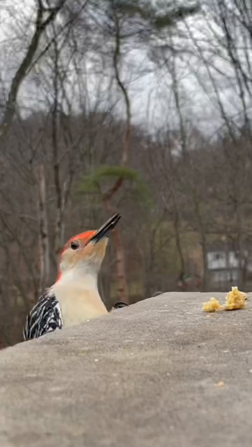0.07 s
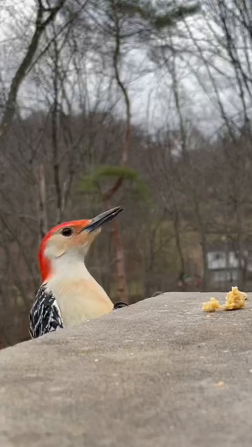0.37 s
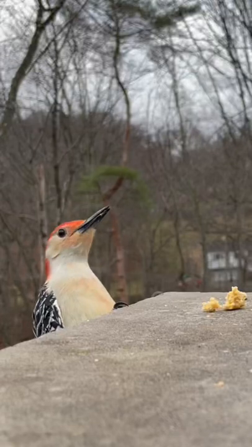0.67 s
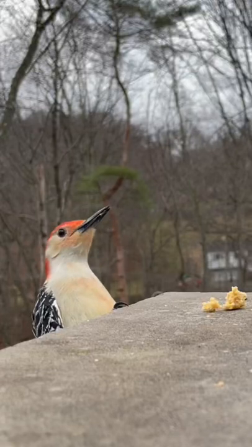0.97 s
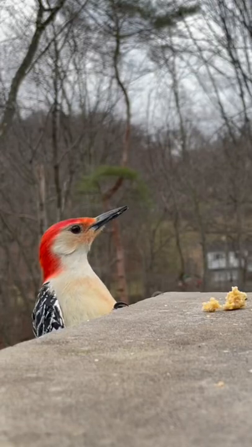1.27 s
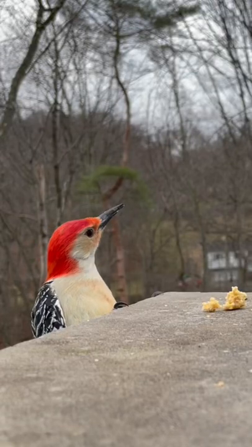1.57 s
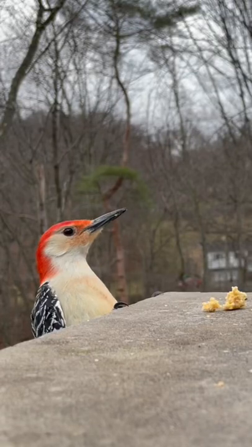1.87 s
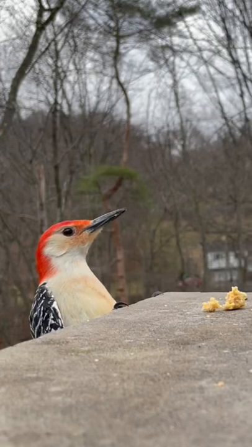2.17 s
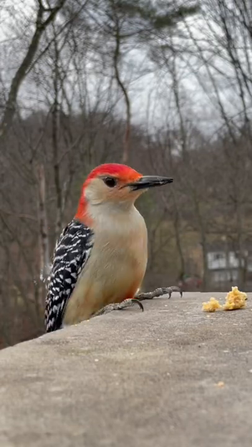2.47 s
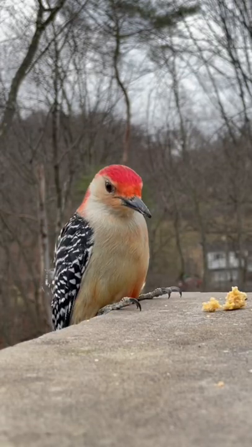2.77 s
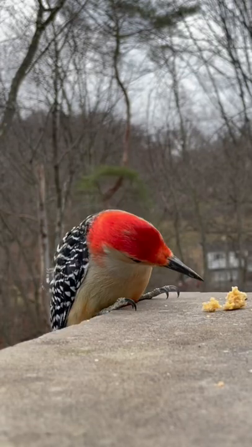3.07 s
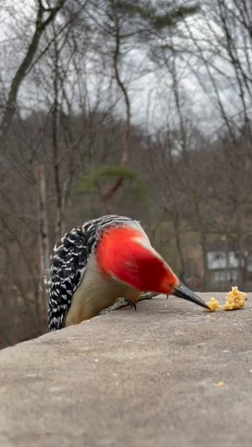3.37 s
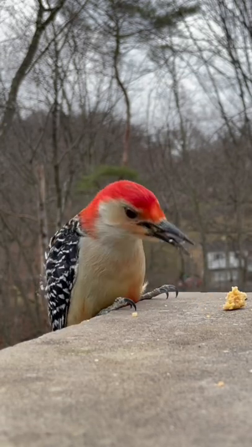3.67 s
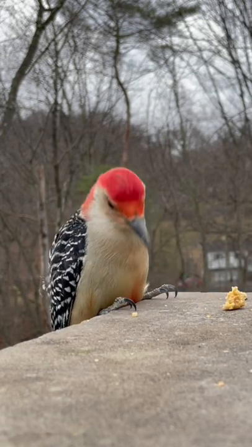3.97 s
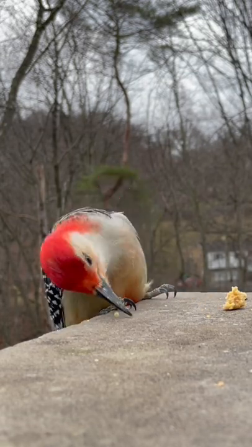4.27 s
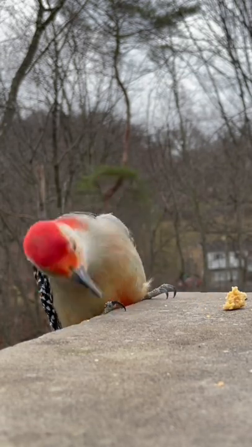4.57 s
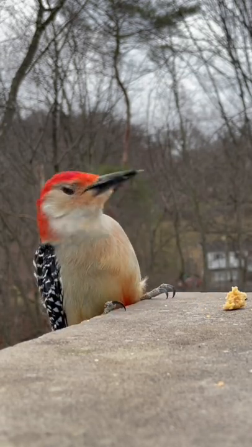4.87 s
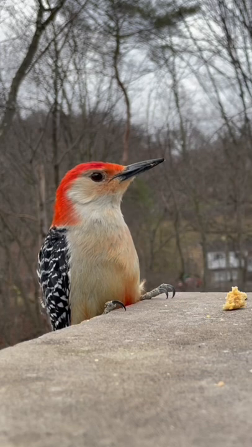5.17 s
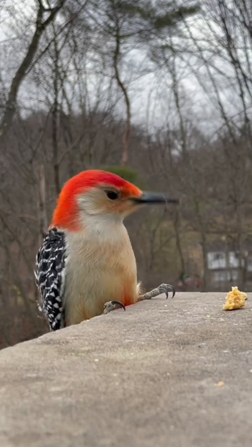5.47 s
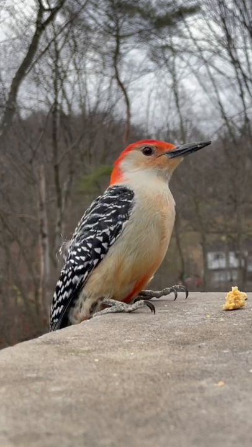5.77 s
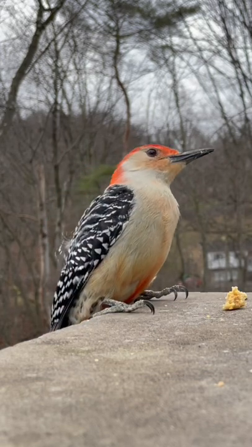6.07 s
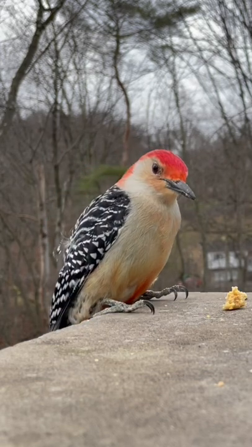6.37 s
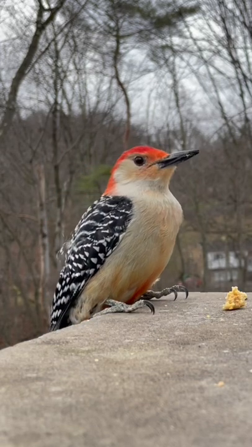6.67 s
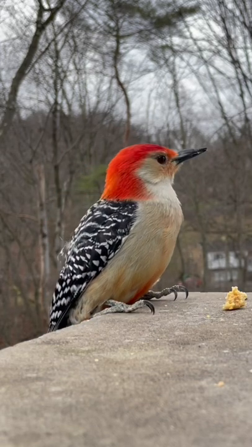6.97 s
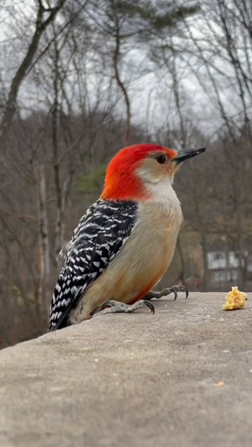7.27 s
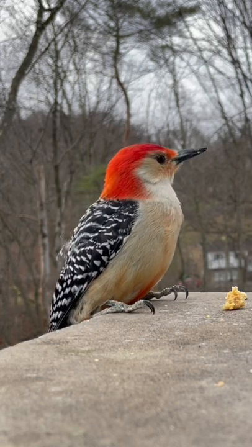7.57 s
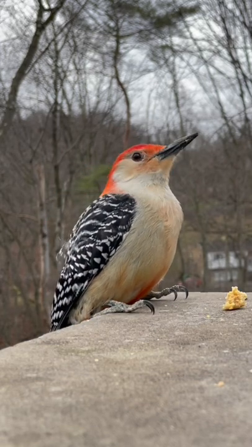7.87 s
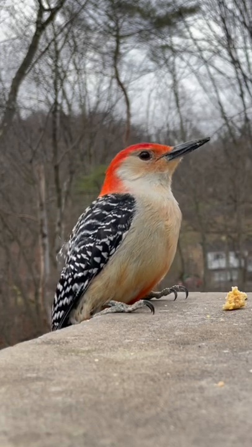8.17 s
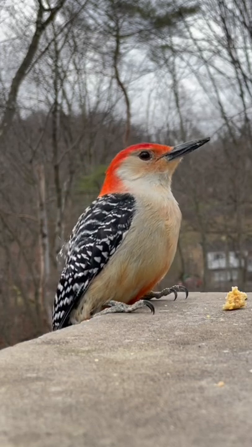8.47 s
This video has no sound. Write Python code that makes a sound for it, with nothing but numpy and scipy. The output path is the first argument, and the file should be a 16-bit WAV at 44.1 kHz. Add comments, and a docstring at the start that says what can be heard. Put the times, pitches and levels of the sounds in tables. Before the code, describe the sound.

The sound opens with a click, a scuff and a quick cluster of dull thuds as the microphone stand is bumped, over by 0.4 seconds. Low outdoor rumble and distant road noise run throughout, the tyre hiss slowly receding, with a faraway engine's low drone that dips briefly before 1 second. A few thin ticks and feather rustles come in the first second. From about 2 to 3.6 seconds a songbird gives a fast, high trill that swells and echoes among trees, slightly to the left. From 2.4 to 5.7 seconds a woodpecker close by ticks and scratches on a stone ledge with claws and beak, feathers rustling softly. There is a soft thud near 4.2 seconds, and the sharpest ticks come around 5.5. Faint distant birds pipe, buzz and chirp, mostly from 3.5 seconds until the end at about 8.5.

```python
"""On a stone ledge at the edge of a wood, a woodpecker shuffles and picks crumbs by a stereo microphone.
Claws and beak tick on the stone, feathers rustle by friction, and the microphone's stand, bumped at
the start, thuds in its low modes. A songbird trills and others call far off, their notes scattered
into reverberation by the trees. Beneath lie broadband road noise and a distant engine's harmonic drone."""
import sys
import numpy as np
from scipy import signal
from scipy.fft import rfft, irfft
from scipy.io import wavfile
from scipy.ndimage import uniform_filter1d

SR = 44100
rng = np.random.default_rng(int(sys.argv[2]) if len(sys.argv) > 2 else 0)


def int16_out(signal):
    """Quantize to a 16-bit WAV file."""
    q = np.round(np.clip(np.atleast_2d(signal).T, -1, 1) * 32767)
    wavfile.write(sys.argv[1], SR, q.astype(np.int16))


N = 375732
T = np.arange(N) / SR
FREQS = np.maximum(np.arange(N // 2 + 1) * SR / N, 1)


def undb(db):
    """Amplitude ratio: tenfold for every 20 dB."""
    return 10 ** (np.asarray(db) / 20)

def over_time(table):
    """Linear interpolation of (seconds, value) rows at every sample."""
    return np.interp(T, *np.transpose(table))

def over_hz(table):
    """Interpolation of (Hz, value) rows on a logarithmic frequency axis."""
    hz, value = np.transpose(table)
    return np.interp(np.log(FREQS), np.log(hz), value)

def colour(x, spectrum):
    """Spectral shaping, normalised so that white noise keeps its power."""
    gain = undb(over_hz(spectrum))
    return irfft(rfft(x) * gain / np.sqrt(np.mean(gain ** 2)), N)

def walk(rate):
    """Random modulation: rate steps a second, smoothed and scaled to unit deviation."""
    k = int(SR / rate)
    steps = np.repeat(rng.standard_normal(N // k + 1), k)
    smooth = uniform_filter1d(uniform_filter1d(steps, k), k)[:N]
    return smooth / smooth.std()

def add(track, s, sound):
    """Superposition: a short sound joins the track at s seconds."""
    i = max(int(s * SR), 0)
    track[i:i + len(sound)] += sound[:N - i]

def tone(hz):
    """A sine of unit power whose phase is the integral of its frequency."""
    return np.sqrt(2) * np.sin(2 * np.pi * np.cumsum(hz) / SR)

def pan(x, left_db):
    """Level difference: the left channel gains left_db over the right."""
    return x * undb(np.array([[left_db], [-left_db]]) / 2)

def ports(x, lag_ms):
    """Path difference: sound reaches the microphone's left port lag_ms after the right."""
    delay = np.array([[lag_ms], [-lag_ms]]) / 2000
    return irfft(rfft(x) * np.exp(-2j * np.pi * FREQS * delay), N)

def scatter(x, t60, direct_db, scatter_db):
    """Reverberation: many reflections merge into an exponential tail, different at each port."""
    t = T[:SR]
    tail = rng.standard_normal((2, SR)) * undb(-60 * t / t60) * (1 - np.exp(-t / 0.0037))
    tail /= np.sqrt(np.sum(tail ** 2, axis=1, keepdims=True))
    reflected = signal.fftconvolve(np.atleast_2d(x), tail, axes=1)[:, :N]
    return undb(direct_db) * x + undb(scatter_db) * reflected


# The engine's fundamental. Each row: time in seconds, level in dB before the bass dip.
FIRING_LEVEL = [(1.6, -43), (1.79, -44.5), (1.95, -41), (3.35, -44.5), (4.98, -38.5), (6.54, -45),
                (7.15, -41), (8.5, -42)]
# A brief dip in the bass of engine and traffic. Each row: time in seconds, relative level in dB.
BASS_DIP = [(.3, 3), (.55, 0), (.58, -13), (.95, -11), (1.35, -1)]

def engine(firing_hz=90.6):
    """Harmonics of the firing rate: only the lowest carry this far, and the air makes each waver."""
    hz = firing_hz + .25 * walk(1)
    dip_db = over_time(BASS_DIP)
    load = np.clip((T - 5.06) / 2.1, 0, 1)  # the octave grows as the engine takes up load
    first = tone(hz + .12 * walk(5)) * undb(over_time(FIRING_LEVEL) + dip_db + .3 * walk(12))
    second = tone(2 * hz) * undb(-68 + 10 * load + dip_db + 1.5 * walk(5))
    third = tone(3 * hz) * undb(-70 + 2 * walk(4.6))
    other_machine = tone(198 + walk(4.1)) * undb(-63 + walk(3.9)) + tone(101 + walk(2.7)) * undb(-62.5)
    return pan(first, left_db=-3) + pan(second, left_db=14) + third + other_machine


# Likeness of the two ports in a diffuse field. Each row: frequency in Hz, correlation.
COHERENCE = [(110, 0.78), (200, 0.32), (300, 0.086), (450, -0.58), (700, -0.77), (1000, -0.5),
             (1500, -0.51), (2100, 0.15), (2650, .62), (3400, -0.19), (4400, 0.25), (7000, -0.46),
             (13000, -0.43)]

def diffuse(spectrum):
    """Diffuse field: noise from all around, its left-right correlation varying with frequency."""
    alike = np.clip(over_hz(COHERENCE), -1, 1)
    mid, side = rfft(rng.standard_normal((2, N))) * np.sqrt(np.array([1 + alike, 1 - alike]) / 2)
    return colour(irfft(np.array([mid + side, mid - side]), N), spectrum)


# Spectra of tyre roar, the nearest car's swish, the rumble of air and traffic, and a faint hiss.
# Each row: frequency in Hz, relative spectral density in dB.
ROAR_SPECTRUM = [(100, -16), (200, -3), (300, -2), (500, -2), (900, 2.5), (1250, -2), (1800, -7.5),
                 (2500, -20), (3200, -29), (4500, -37.5), (7000, -47), (9000, -71.5)]
SWISH_SPECTRUM = [(1500, -9.5), (3200, 1), (5500, -4), (7000, -10.5), (9000, -25)]
RUMBLE_SPECTRUM = [(20, -53), (32, -7), (48, 5.5), (75, 9), (105, 2), (135, 5), (200, 1), (320, -7),
                   (600, -60.5)]
HISS_SPECTRUM = [(3000, 2), (6500, -6.5), (8500, -25), (10500, 7), (12500, 9), (14000, -16), (16000, -8.5)]

def traffic(recede_s=3.74, settle_s=0.095):
    """Attenuation with distance: as cars draw away, the swish dies first and the roar sinks and dulls."""
    roar = diffuse(ROAR_SPECTRUM)
    treble = irfft(rfft(roar) * over_hz([(1200, 0), (2200, 0.72)]), N)
    roar_db = -48.5 + 6.5 * np.exp(-T / recede_s) + .5 * walk(7)
    treble_db = -43 - T + .5 * walk(6)  # falls 1 dB a second
    tyres = (roar - treble) * undb(roar_db) + treble * undb(treble_db)
    swish = diffuse(SWISH_SPECTRUM) * undb(-72.5 - 14.5 * T + walk(25))
    shake_db = 13 * np.exp(-T / settle_s)  # more rumble while the bumped stand settles
    rumble = diffuse(RUMBLE_SPECTRUM) * undb(-50.5 + shake_db + 1.4 * over_time(BASS_DIP))
    return pan(tyres + swish, left_db=2) + rumble + undb(-92.5) * diffuse(HISS_SPECTRUM)


def chorus(count=640):
    """Spherical spreading: far birds' notes weaken with distance, and echoes blur them to a twitter."""
    song = np.zeros(N)
    for when, pitch, length, slur, distance in rng.random((count, 5)):
        t = T[:int((.03 + .07 * length) * SR)]
        hz = (2300 + 1100 * pitch) * (1 + .4 * (slur - .6) * t / t[-1])
        add(song, when * T[-1], tone(hz) * np.hanning(len(t)) / (1 + 2 * distance))
    return pan(scatter(song * undb(-85), t60=0.39, direct_db=-15.5, scatter_db=6), left_db=9.5)


# The first row is a short click and scuff as the sound opens; the others are claws and beak on stone.
# Each row: start in seconds, relative level in dB, length of the scrape in seconds, level of the
# knock in dB relative to the scratch.
TICKS = [(.037, -54.5, 0.021, 8.5), (.238, -63, .004, -2.5), (.532, -63, .0033, -11.5),
         (.665, -78, .004, -9.5), (.905, -73.5, .005, -3), (2.464, -62.5, .008, -5),
         (2.476, -64, .005, -14), (2.507, -54.5, .0036, -4.5), (2.547, -65, .006, -6.5),
         (2.621, -73, .0015, -4), (2.884, -62.5, .0057, -9.5), (2.940, -56, 0.0037, -12),
         (3.234, -68.5, .003, -11.5), (3.377, -67, .002, -10), (3.392, -69, .002, -9),
         (3.464, -63, .002, -13), (3.597, -72, .002, -11.5), (3.685, -61, .0018, -4),
         (4.133, -67.5, 0.0023, 19.5), (4.171, -68.5, .003, 9.5), (4.254, -67, 0.0032, 15.5),
         (4.263, -69.5, .004, 2), (4.387, -53.5, .002, -16), (4.428, -64, .0027, -5),
         (4.488, -77, .003, 21.5), (4.564, -57, 0.0084, 3), (4.877, -72.5, .005, -6),
         (5.379, -76.5, .002, -10), (5.463, -53, 0.0018, -14.5), (5.4924, -50.5, 0.0057, -8.5),
         (5.499, -51.5, .0046, -6), (5.565, -59, 0.0033, -10), (5.5694, -57.5, .0036, -10.5),
         (5.613, -61, .0044, -4), (5.6225, -51, .002, -12.5), (5.666, -62.5, .005, -2)]
# The sharp scratch and the stone's knock. Each row: frequency in Hz, relative spectral density in dB.
SCRATCH_SPECTRUM = [(3000, -27.5), (6000, -18.5), (9000, -5.5), (11000, -6.5), (12700, 0), (14300, -10.5),
                    (16000, -12.5)]
KNOCK_SPECTRUM = [(1000, 4), (2500, -1), (3400, -2), (4100, -6), (4900, -10), (7000, -11), (10000, -17),
                  (16000, -40)]

def ticks():
    """Broadband transients: after an opening click, claws and beak catch on the grit in tiny bursts."""
    scratch, knock, t = np.zeros(N), np.zeros(N), T[:SR // 8]
    for s, db, length, knock_db in TICKS:
        envelope = np.exp(-(t / length) ** 2) + undb(-24) * np.exp(-t / .016)
        burst = rng.standard_normal(len(t)) * undb(db) * envelope
        add(scratch, s, burst)
        add(knock, s, burst * undb(knock_db))
    return undb(-2.5) * (colour(scratch, SCRATCH_SPECTRUM) + colour(knock, KNOCK_SPECTRUM))


def grit(clicks_per_s=140):
    """A Poisson process: sand grains click underfoot at random, most small and a few large."""
    clicks = rng.random(N) < clicks_per_s / SR
    size = undb(9 + 3.5 * np.minimum(rng.exponential(size=N), 4))
    return clicks * size * rng.choice([-1, 1], N)


# Moves of feathers and feet. Each row: start in seconds, relative level in dB, length in seconds.
MOVES = [(0.047, -63.5, .02), (0.152, -68, .04), (0.298, -69.5, 0.013), (0.438, -73.5, 0.023),
         (0.503, -80.5, 0.082), (0.623, -89, 0.32), (2.337, -75.5, 0.2), (2.62, -86.5, .04),
         (2.885, -73.5, 0.05), (3.25, -80, 0.083), (3.335, -83, .075), (3.485, -81, .035), (3.6, -81, .12),
         (4.14, -77, .04), (4.26, -80.5, 0.15), (4.424, -84, .1), (4.563, -72, .04), (4.69, -90, 0.055),
         (4.874, -83, .04), (5.257, -77, 0.031), (5.497, -66, .02), (5.6, -81.5, 0.055)]
# The rustle's spectrum. Each row: frequency in Hz, relative spectral density in dB.
RUSTLE_SPECTRUM = [(3000, -8), (5500, -8), (8000, -5), (9300, -19.5), (10800, -6.5), (12700, -3.5),
                   (14500, -16.5), (16000, -26)]

def rustle(rise_db_per_s=499, fall_db_per_s=159.5):
    """Friction noise: feathers brush and grit crunches as each move rises, holds and dies away."""
    brush = rng.standard_normal(N) * undb(-7.5 + 3.3 * walk(500) + 1.5 * walk(54))
    envelope = np.zeros(N)
    for s, db, length in MOVES:
        before, after = np.maximum(s - T, 0), np.maximum(T - s - length, 0)
        envelope += undb(db - rise_db_per_s * before - fall_db_per_s * after)
    return colour((brush + grit()) * envelope, RUSTLE_SPECTRUM)


# The woodpecker's treble reaches the left port late. Each row: frequency in Hz, phase lag in radians.
PORT_LAG = [(5000, 0.5), (8000, 2.56), (10200, 4.13), (13000, 6.2)]

def woodpecker():
    """Early reflections: the stone and things close by briefly scatter the ticks and the rustle."""
    left, right = scatter(ticks() + rustle(), t60=.12, direct_db=0.5, scatter_db=-14)
    late_left = irfft(rfft(left) * np.exp(-1j * over_hz(PORT_LAG)), N)
    return np.array([late_left, right])


def rocking(count=5, jolt_s=.093, contact_s=0.0035):
    """Damped rocking: a jolt sets the stand on its feet in ever weaker, more widely spaced bumps."""
    gaps = .0081 * 1.21 ** np.arange(count)
    return [(jolt_s + gaps[:k].sum(), -14.5 - 2.5 * k, contact_s) for k in range(count)]


# Bumps on the stand. Each row: start in seconds, relative level in dB, contact time in seconds.
BUMPS = [(.045, -24.5, 0.012), (.0683, -20.5, 0.011), (0.0886, -26, 0.0024), (.1024, -17.5, 0.0015),
         (.144, -15.5, 0.011), (.298, -27.5, 0.012), (4.18, -31.5, 0.028)]
# The stand's modes. Each row: frequency in Hz, gain in dB, time to decay by 60 dB in seconds.
STAND_MODES = [(89, 7.5, 0.055), (202, 12.5, 0.024), (402, 7.5, 0.051), (483, 6, 0.047), (605, -1, 0.078),
               (794, 1.5, 0.044)]

def stand(twist_db=-14.5):
    """Modal resonance: bumps ring the stand's low modes, and a longer contact gives a duller thud."""
    push, twist, t = np.zeros(N), np.zeros(N), T[:SR // 2]
    for k, (s, db, contact) in enumerate(BUMPS + rocking()):
        pulse = np.hanning(int(contact * SR) + 3)
        pulse *= undb(db) / pulse.sum()
        add(push, s, pulse)
        add(twist, s, pulse * (-1) ** k * undb(twist_db))  # left and right in turn
    force = ports(push, lag_ms=.4) + np.array([twist, -twist])
    ring = sum(undb(db - 60 * t / t60) * np.sin(2 * np.pi * hz * t) for hz, db, t60 in STAND_MODES)
    thuds = signal.fftconvolve(force, ring[None], axes=1)[:, :N]
    # a 50 Hz high-pass trims the deepest bass from the thuds
    return signal.sosfilt(signal.butter(2, 50, "highpass", fs=SR, output="sos"), thuds)


def sing(notes, rasp=.0035, buzz_rate_hz=65):
    """Frequency modulation: each gliding note wavers by the fraction rasp, and some buzz unevenly."""
    song = np.zeros(N)
    waver, depth = 1 + rasp * walk(260), 1 + .35 * walk(90)
    for s, length, start_hz, end_hz, db, buzz_hz in notes:
        t = T[:int(length * SR)]
        buzz = buzz_hz * np.sin(2 * np.pi * buzz_rate_hz * t) * np.interp(s + t, T, depth)
        hz = (np.linspace(start_hz, end_hz, len(t)) + buzz) * np.interp(s + t, T, waver)
        add(song, s, tone(hz) * signal.windows.tukey(len(t), .7) * undb(db))
    flutter = undb(0.2 * walk(45))  # from branches and moving air
    return song * flutter / np.sqrt(np.mean(flutter ** 2))


# Single notes of far birds. Each row: start in seconds, length in seconds, first and last frequency
# in Hz, relative level in dB, mean depth of the buzz in Hz.
FAR_CALLS = [(.152, 0.02, 6660, 7230, -70, -3), (1.912, 0.034, 3430, 3430, -72, -2),
             (3.088, 0.037, 4170, 4100, -72, 0), (3.565, 0.041, 3400, 3280, -71, 0),
             (3.45, 0.055, 6640, 6450, -74, 0), (3.635, .04, 3000, 2720, -70, -2),
             (3.858, 0.07, 6620, 6450, -73, -3), (4.185, 0.2, 6530, 6490, -84, 4),
             (4.24, 0.25, 5620, 5330, -77, 521), (4.42, .27, 5260, 5150, -74.5, 240),
             (4.47, .07, 2500, 2810, -70, -2), (4.7, 0.11, 6100, 5800, -84, 298.5),
             (4.74, 0.25, 4920, 4870, -78.5, 65), (4.92, 0.41, 4910, 4800, -79, 68),
             (5.255, 0.25, 3510, 3665, -72.5, 54), (5.27, .17, 3800, 3910, -77, 86),
             (5.705, 0.1, 4630, 4480, -76, 25), (5.72, .1, 4950, 5000, -84, 86),
             (5.935, 0.051, 3540, 3260, -70, -4), (5.99, .07, 5900, 5260, -86, 145.5),
             (6.27, 0.066, 5850, 5300, -88, 149), (6.36, .05, 4420, 4200, -84, -1),
             (6.38, .14, 2750, 2650, -71.5, 61), (6.72, .12, 3470, 3560, -83, 72),
             (6.953, 0.04, 2926, 2970, -69.5, 2), (7.04, 0.086, 3350, 3430, -79.5, 52),
             (7.165, 0.06, 5230, 5170, -78.5, -1), (7.215, 0.055, 5120, 5570, -81.5, 0),
             (7.384, .11, 5470, 5230, -79.5, 142), (7.455, .035, 5200, 4600, -77.5, 498),
             (7.57, .03, 4900, 4400, -78.5, 596)]
# One bird's quick, uneven triplets of steep slurs. Each row: as above, without the buzz.
SLURS = [(5.061, .062, 4800, 3250, -73), (5.133, 0.062, 4700, 3400, -76), (5.2, .058, 4900, 3200, -76),
         (8.232, .074, 5300, 3100, -77), (8.311, 0.043, 4930, 3450, -78.5), (8.355, 0.067, 4800, 3080, -76)]

def far_birds():
    """Multiple scattering: calls from deep in the wood arrive mostly as echoes."""
    deep = scatter(sing(FAR_CALLS), t60=.62, direct_db=-8, scatter_db=-4.5)
    quick = piping() + sing([(*slur, 0) for slur in SLURS], rasp=.008)
    twig_blurred = scatter(quick, t60=.05, direct_db=-2, scatter_db=-4.5)
    return pan(deep + scatter(twig_blurred, t60=.6, direct_db=-5.5, scatter_db=-5), left_db=13)


# Thin, bright ticks, likely claws on the ledge's edge. Each row: start in seconds, relative level in dB.
CHIPS = [(.665, -70), (.768, -78), (.795, -77), (.83, -81), (.845, -75), (.868, -69), (0.905, -67.5),
         (.966, -77), (1.093, -74), (4.345, -81), (4.38, -77), (4.893, -83)]
# Their ring. Each row: frequency in Hz, relative spectral density in dB.
CHIP_SPECTRUM = [(4500, -27), (6500, -16), (7500, -16), (7950, 0), (8450, -16), (9500, -28), (12000, -22),
                 (14500, -40)]

def chips(decay_s=0.0075):
    """Resonance: tiny noise bursts excite a brief high ring, scattered by things close by."""
    bursts, t = np.zeros(N), T[:SR // 10]
    for s, db in CHIPS:
        add(bursts, s, rng.standard_normal(len(t)) * undb(db) * np.exp(-t / decay_s))
    return pan(scatter(colour(bursts, CHIP_SPECTRUM), t60=.2, direct_db=-1, scatter_db=-7), left_db=7)


# One syllable of the trill: four steep strokes, each a list of points.
# Each row: time offset within the syllable in seconds, nominal frequency in Hz, relative level in dB.
SYLLABLE = [
    [(-.044, 3880, -14), (-.040, 4900, -11), (-.037, 5700, -13)],
    [(-.0385, 3850, -12), (-.0355, 5000, -4), (-.032, 5700, -.5), (-.027, 6120, -7), (-.016, 6120, -8.5),
     (-.008, 6480, -13), (0, 7230, 0), (.006, 7700, -7), (.012, 7950, -16)],
    [(-.020, 4900, -17), (-.016, 5800, -7), (-.012, 6050, -8)],
    [(0, 4500, -15), (.003, 5250, -7), (.0055, 5800, -9), (.009, 6020, -3.5), (.015, 5950, -8)],
]

def trill(count=18, start_s=1.931, gap_s=.0906, slowing_s=.00016, swell_s=0.69):
    """Two-voice phonation: the two sides of a songbird's syrinx sweep upwards in overlapping strokes."""
    song = np.zeros(N)
    for k in range(count):
        sung = k * gap_s + slowing_s * k * k / 2
        swell_db = -18 * max(1 - sung / swell_s, 0) ** 2.4
        ease_db = -3 * (k / (count - 1)) ** 6
        db = -54 + swell_db + ease_db
        sag = .935 + .095 * np.exp(-sung / 1.1)
        for stroke in SYLLABLE:
            detune, effort_db, late_s, accent_db = rng.standard_normal(4) * [.007, .7, .0007, 1.5]
            s, pitch, level = np.transpose(stroke)
            # as the trill goes on, its low parts sag in pitch and creep ahead of the top
            low = np.interp(pitch, [6200, 7200], [1, 0])
            s = s - low * .005 * (sung - swell_s)
            t = np.arange(s[0], s[-1], 1 / SR)
            hz, stroke_db = np.interp(t, s, pitch * sag ** low), np.interp(t, s, level)
            hook_db = accent_db * np.exp(-((hz - 6000) / 350) ** 2)  # where the stroke hooks over
            quiver = 1 + .006 * np.interp(t, np.linspace(t[0], t[-1], 12), rng.standard_normal(12))
            chirp = tone(hz * quiver * (1 + detune)) * signal.windows.tukey(len(t), .12)
            add(song, start_s + sung + t[0] + late_s, chirp * undb(db + stroke_db + effort_db + hook_db))
    return song

def songbird(echo_s=0.038):
    """Multipath propagation: a trunk throws the trill back, and branches make it flutter and blur."""
    song = trill() * undb(1.4 * walk(250))
    song = song + undb(-14) * np.interp(T - echo_s, T, song)
    near = scatter(song, t60=.05, direct_db=-8.3, scatter_db=-17.5)
    far = scatter(song, t60=.7, direct_db=-40, scatter_db=-6.5)
    return pan(near + far, left_db=6)


def piping(count=6, start_s=3.76, gap_s=.119, length_s=0.051):
    """Periodic repetition: one bird pipes the same falling note, each softer than the last."""
    return sing([(start_s + k * gap_s, length_s, 4660, 4260, -74.5 - .5 * k, 0) for k in range(count)])


def scene():
    """Linear superposition: the pressures of all the sources around the ledge add."""
    return engine() + traffic() + stand() + woodpecker() + songbird() + far_birds() + chorus() + chips()

def record(dry, start_s=.035, top_hz=15800):
    """Gating and band limiting: the sound opens after a moment, and a steep low-pass cuts the top."""
    return signal.sosfilt(signal.ellip(10, .2, 80, top_hz, fs=SR, output="sos"), dry * (T >= start_s))


dry = scene()
out = record(dry)
int16_out(out)
```